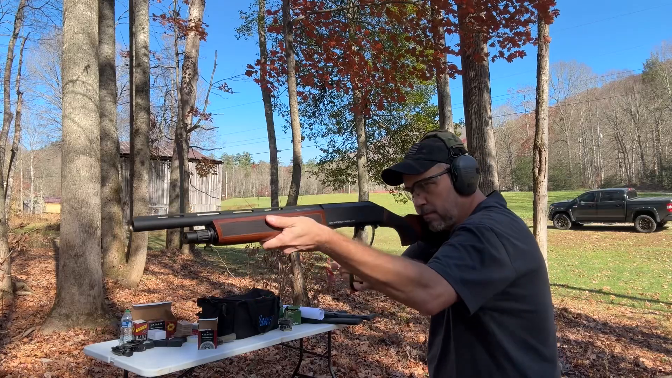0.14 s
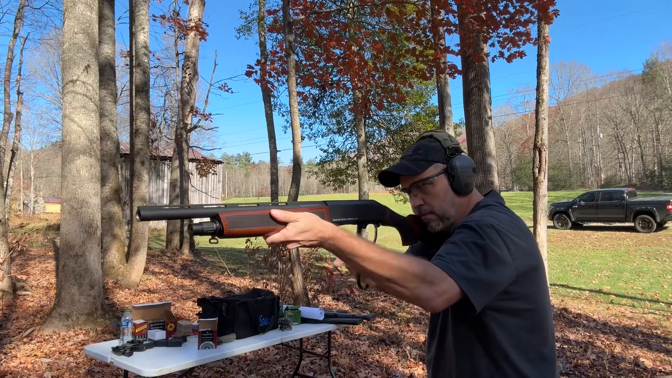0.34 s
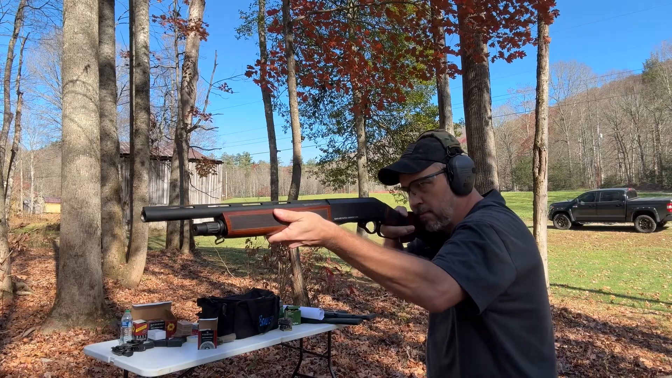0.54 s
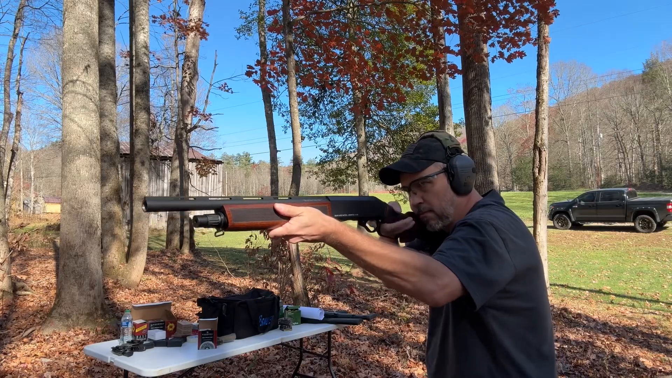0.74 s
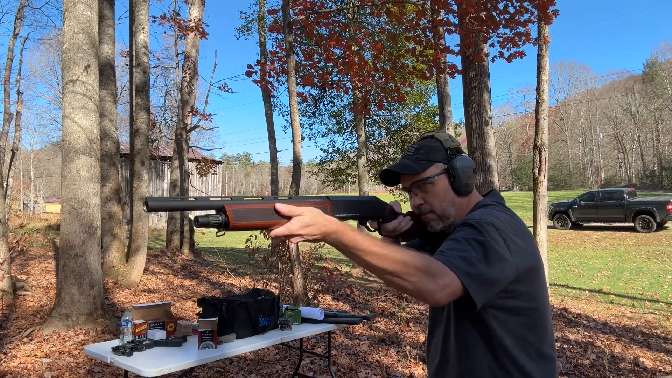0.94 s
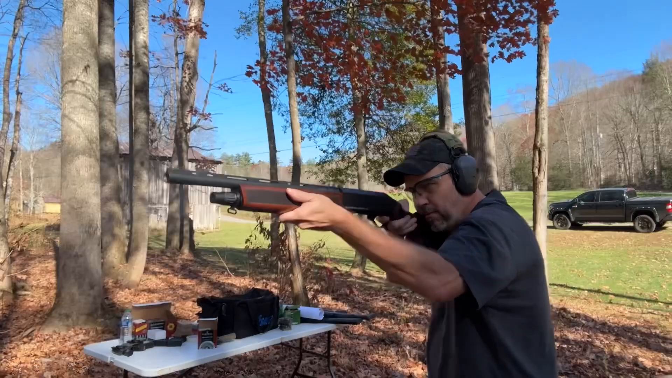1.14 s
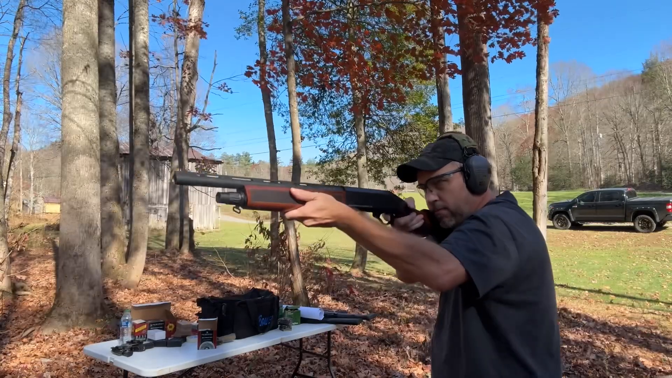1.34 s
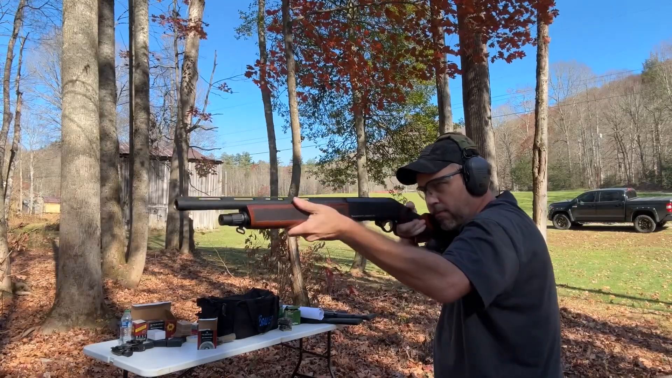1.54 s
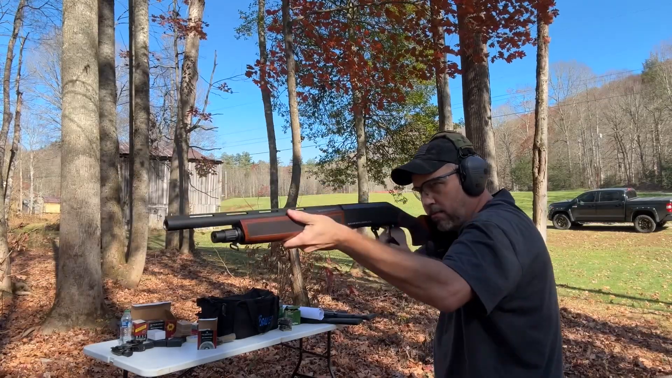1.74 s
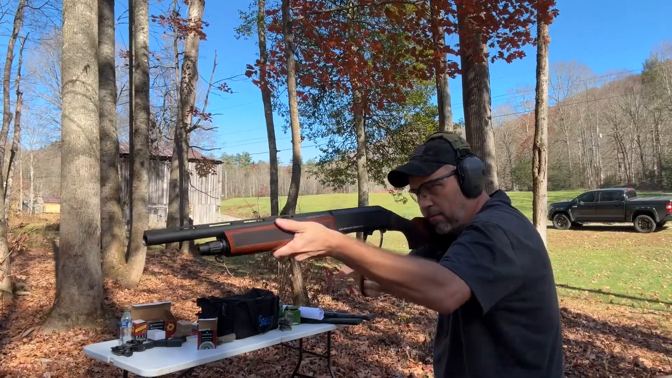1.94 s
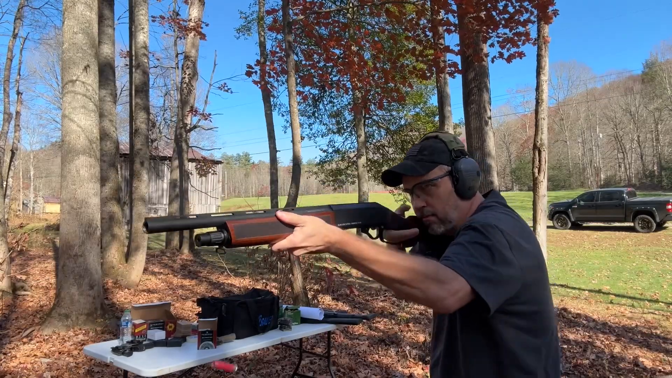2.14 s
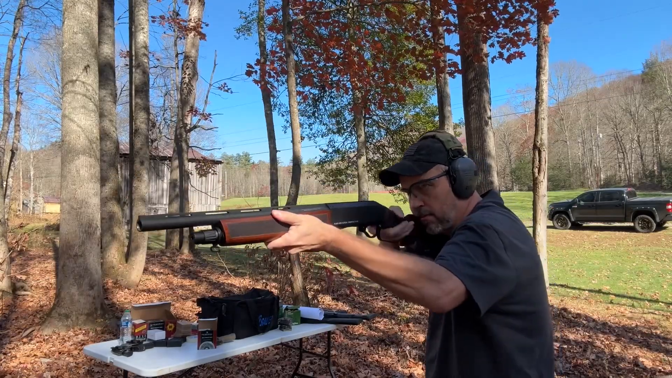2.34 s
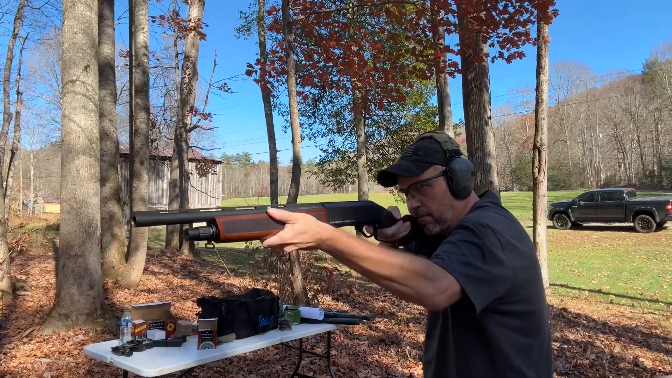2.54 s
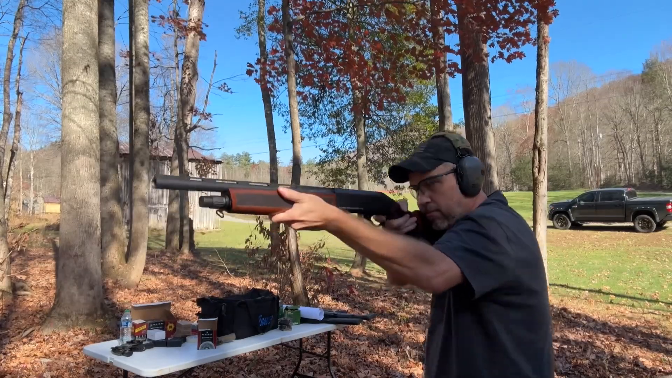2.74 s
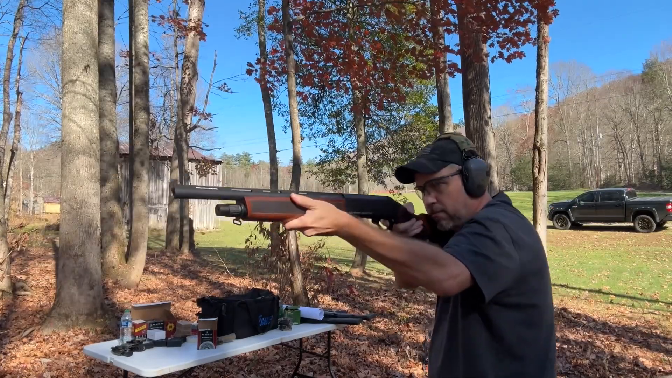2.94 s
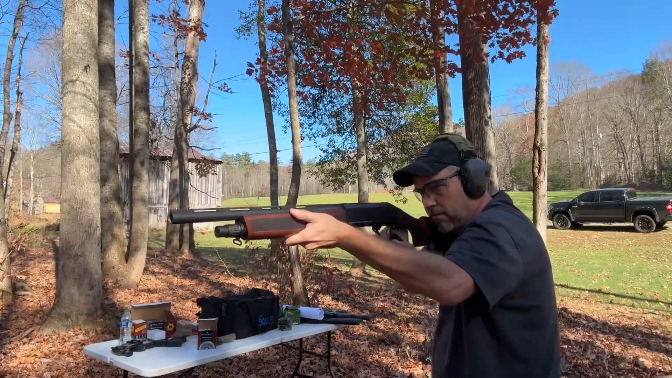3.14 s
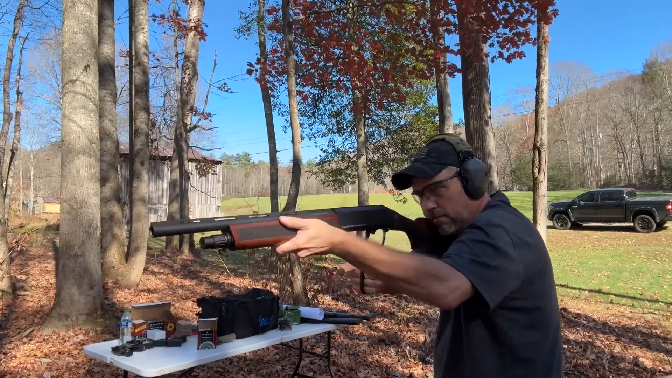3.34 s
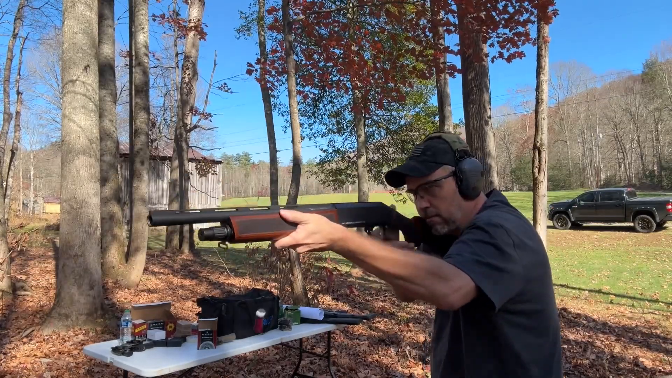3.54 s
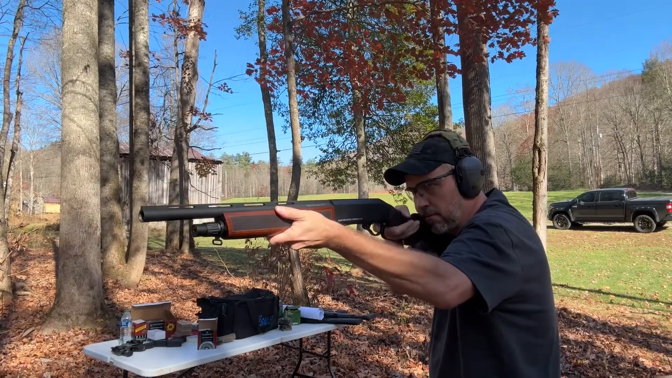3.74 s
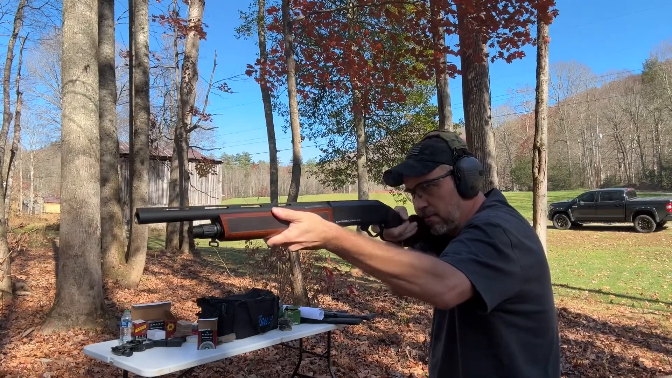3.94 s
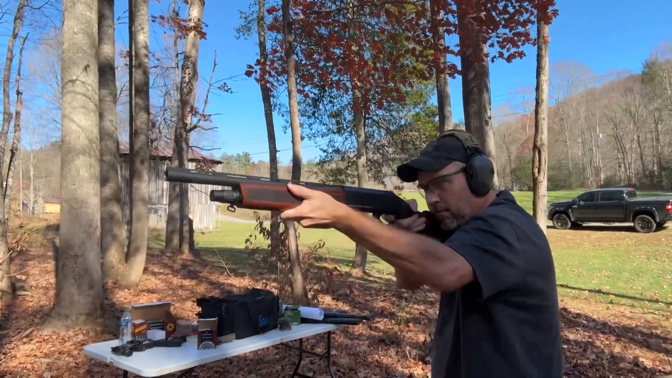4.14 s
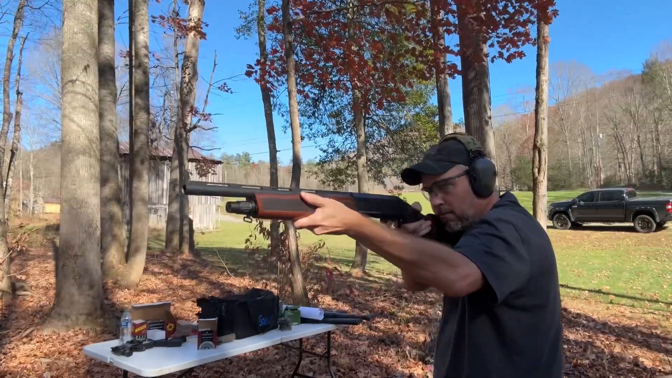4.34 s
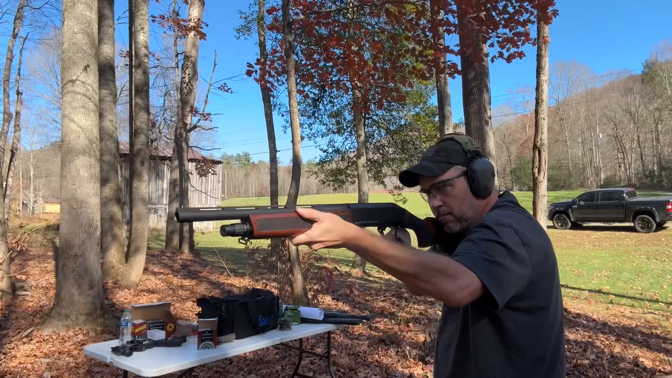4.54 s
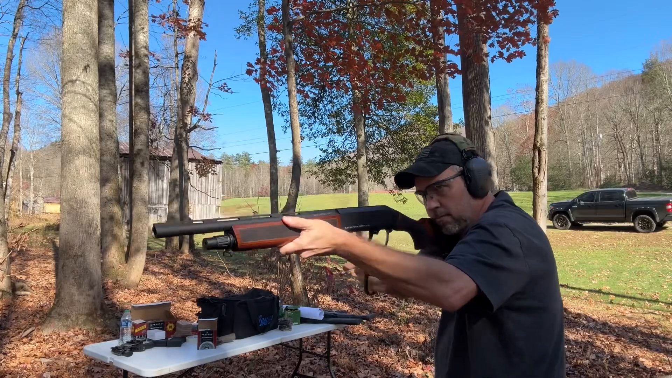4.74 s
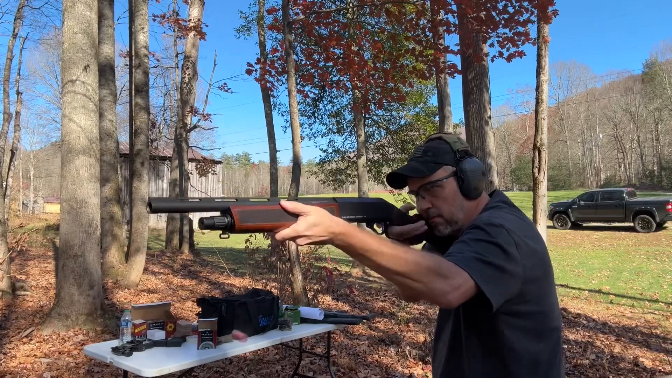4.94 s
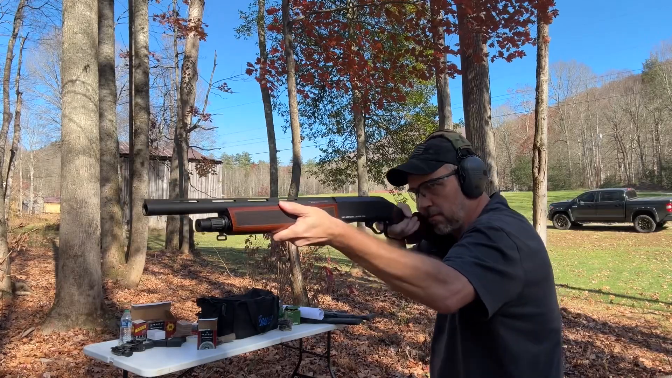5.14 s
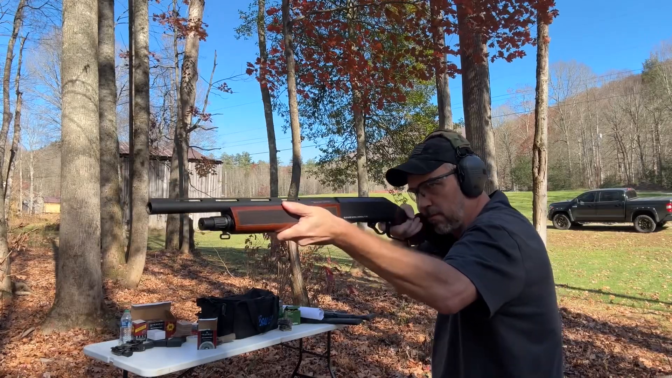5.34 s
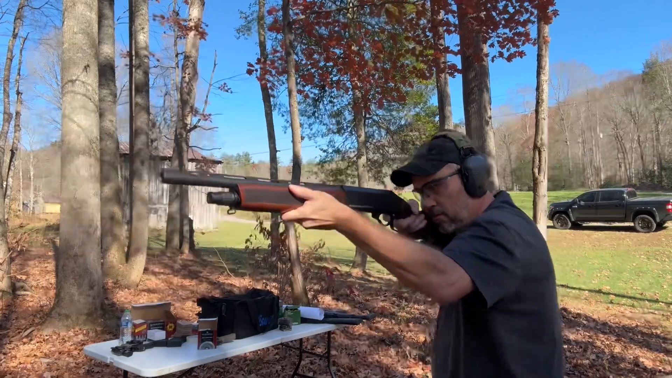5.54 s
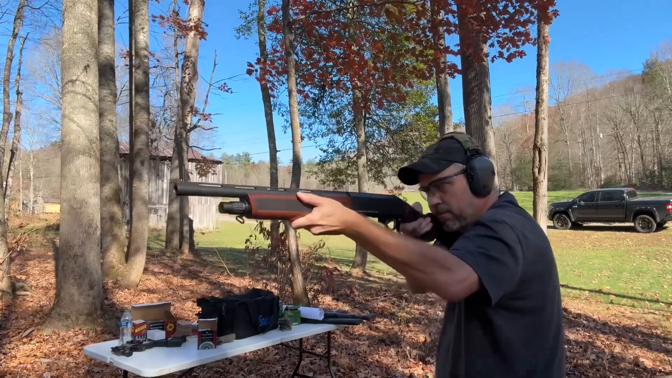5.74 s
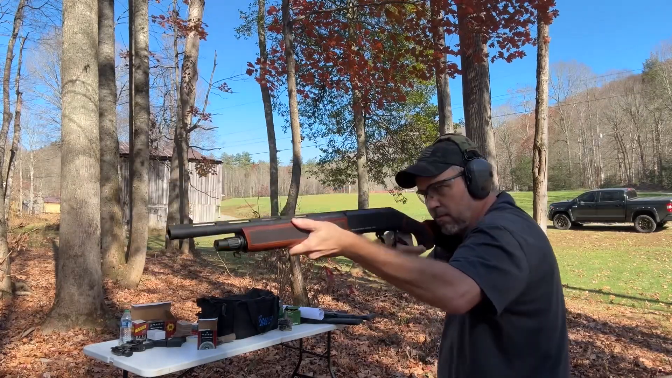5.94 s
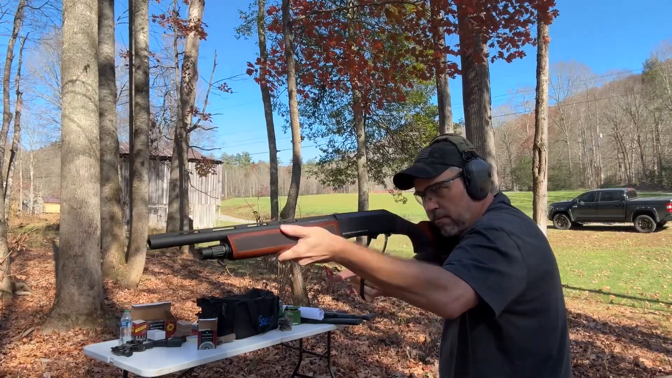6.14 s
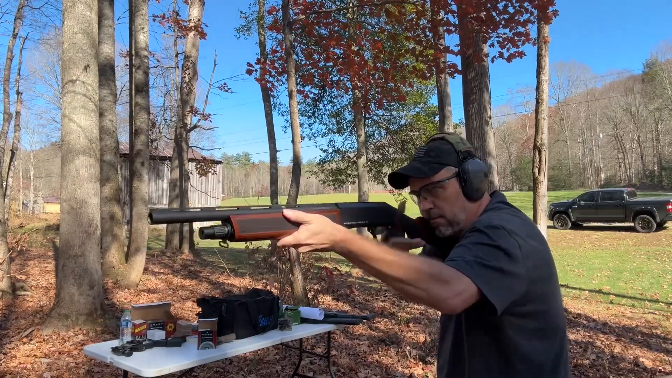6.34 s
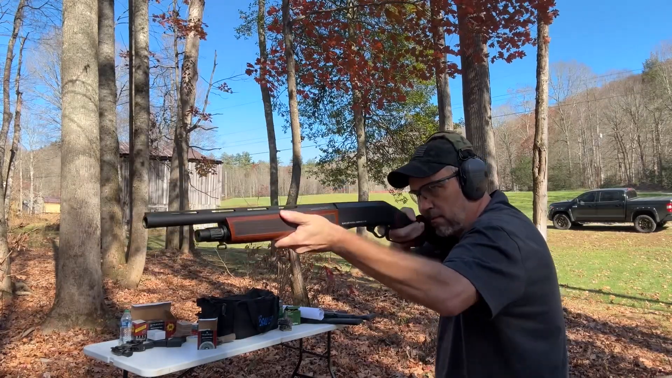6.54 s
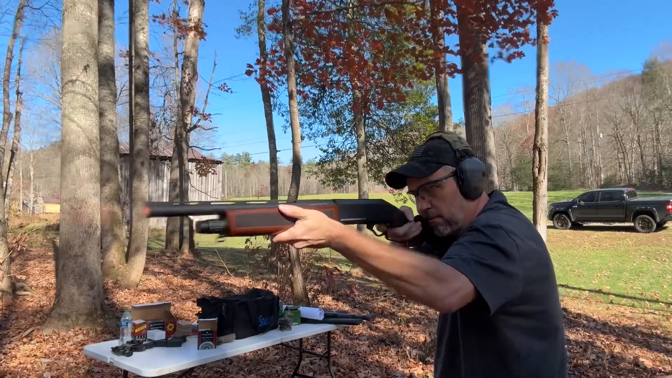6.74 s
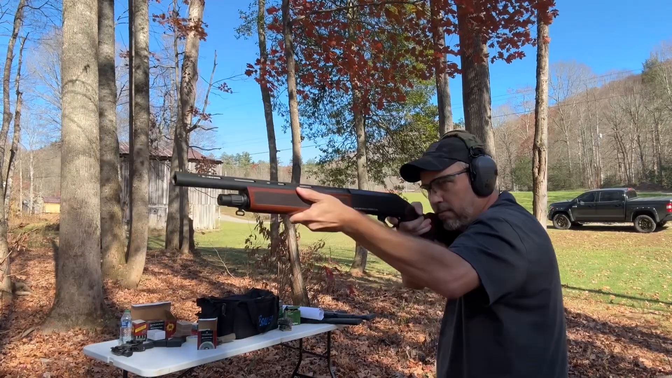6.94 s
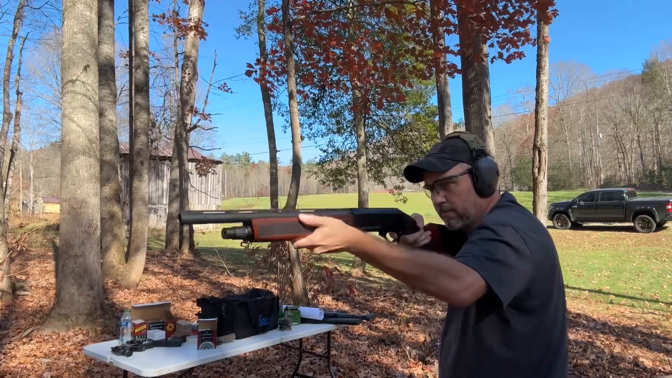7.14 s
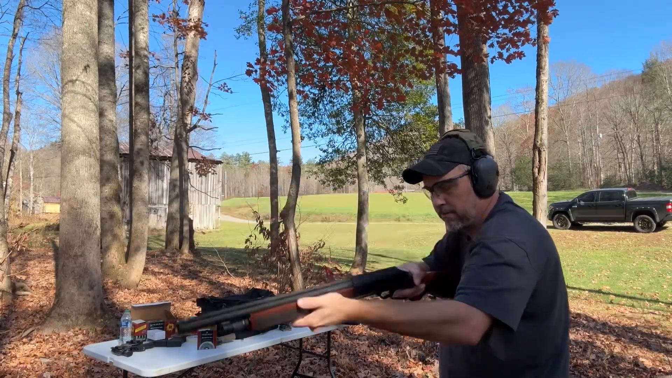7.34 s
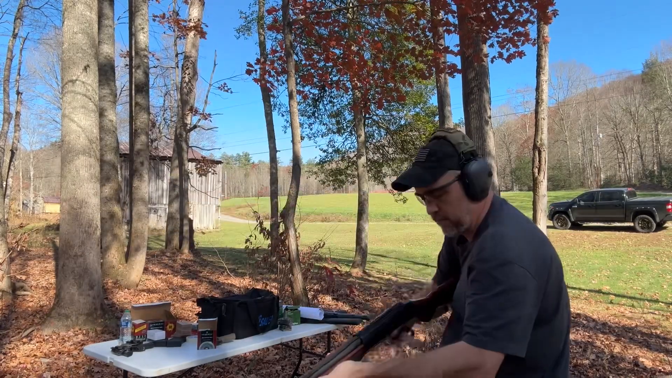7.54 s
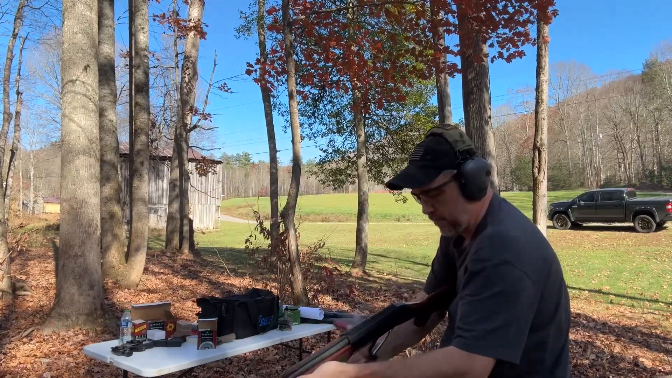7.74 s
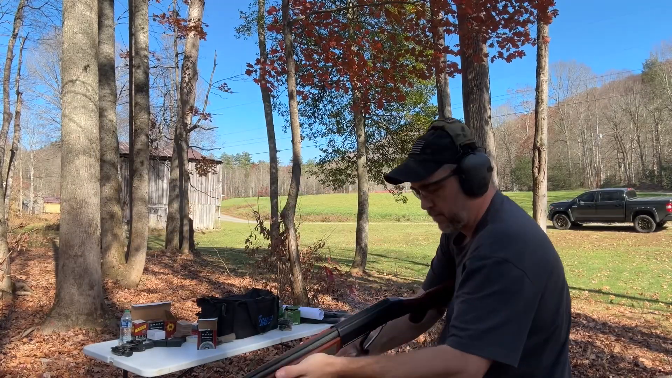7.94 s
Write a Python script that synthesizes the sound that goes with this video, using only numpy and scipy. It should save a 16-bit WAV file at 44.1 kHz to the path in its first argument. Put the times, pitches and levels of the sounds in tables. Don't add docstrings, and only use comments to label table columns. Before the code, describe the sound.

Outdoors at a wood's edge, a lever gun is worked sharply and fired five times, each blast booming and echoing off trees and hillside.

```python
import sys
import numpy as np
from scipy import signal
from scipy.fft import rfft, irfft, next_fast_len
from scipy.io import wavfile
from scipy.ndimage import uniform_filter1d, map_coordinates

SR = 44100
rng = np.random.default_rng(int(sys.argv[2]) if len(sys.argv) > 2 else 0)


def waveform_to_disk(signal):
    frames = np.transpose(np.atleast_2d(signal))
    scaled = np.clip(frames, -1, 1) * 32767
    samples = np.round(scaled).astype(np.int16)
    wavfile.write(sys.argv[1], SR, samples)


def boost(x):
    u = np.asarray(x, float) / 20
    return 10 ** u


N = 356442

# [t/s, crack/dB, lead-in/s, lead-in/dB, pause before crack/s]
SHOTS = [
    (1.13, -9, 0.017, -5, 0.0036),
    (2.633, -3.5, 0.027, -11.5, 0.0006),
    (3.999, -4, 0.027, -19.5, 0.00046),
    (5.4948, -8.5, 0.029, -23.5, 0.00044),
    (6.777, -7, 0.022, -25, 0.00075),
]
# [near trees/dB, far hillside/dB, trunks/dB, barn/dB, tree line/dB]
ANSWERS = [
    (-14, -33.5, 0, -11.5, -7),
    (-15, -30, 2, 5.5, -6.5),
    (-14, -30, 0, -5, 9),
    (-16, -28, -4, 2.5, 7),
    (-14, -29.5, 0, -1.5, 5),
]
# [t/s, early/dB, late/dB]
ECHO_GAIN = [
    (1.1305, 1, -5),
    (2.6339, -1.5, -1.5),
    (3.999, 0, -1.5),
    (5.4942, -3, 1),
    (6.7776, 0.5, 0.5),
]
# [f/Hz, likeness/1]
WOODS_ALIKE = [(40, 1), (130, 0.66), (400, 0.21), (800, 0.53), (1500, 0.21), (3000, 0.037)]
# [f/Hz, density/dB per Hz]
STEEL = [(70, -48), (130, -30.5), (200, -20), (570, -3.5), (1800, -5), (2500, -6), (4300, -6), (9600, -8),
         (13200, -13.5), (16500, -18)]
# [f/Hz, level/dB, t60/s]
BOLT = [(1268, -8, 0.056), (1590, -7, 0.022), (1828, -4.5, 0.037), (2211, -10.5, 0.052),
        (2730, -10.5, 0.032), (3824, -6, 0.017), (4286, -7, 0.017), (5240, -10, 0.012), (7795, -17.5, .035),
        (8230, -11, .03), (10230, -3, 0.056), (10470, -7.5, 0.043), (11700, -8.5, 0.034),
        (13600, -5.5, 0.03)]


def unit(x):
    return x / np.sqrt(np.mean(x ** 2) + 1e-20)


def along(points, hz):
    f, v = np.transpose(points)
    return np.interp(np.log(hz + 1), np.log(f + 1), v)


def filtered(x, response):
    m = next_fast_len(x.shape[-1] + 2048)
    return irfft(rfft(x, m) * response(np.fft.rfftfreq(m, 1 / SR)), m)[..., :x.shape[-1]]


def spread(pair, alike, lead_s=0):
    m = next_fast_len(pair.shape[-1] + 8192)
    hz = np.fft.rfftfreq(m, 1 / SR)
    turn = np.arccos(np.clip(along(alike, hz), -1, 1)) / 2
    mid, side = rfft(pair, m) * [np.cos(turn), np.sin(turn)]
    shift = np.exp(1j * np.pi * hz * lead_s)
    return irfft(np.array([(mid + side) * shift, (mid - side) / shift]), m)[:, :pair.shape[-1]]


def add(track, s, sound):
    part = track[..., max(round(s * SR), 0):][..., :sound.shape[-1]]
    part += sound[..., :part.shape[-1]]


def swells(rows):
    gain = np.zeros(N)
    t = np.arange(-SR // 10, SR // 2) / SR
    for s, db, rise, hold, fall in rows:
        shape = boost(db - rise * np.clip(-t, 0, 1) - fall * np.clip(t - hold, 0, 1))
        add(gain, s + t[0], shape[max(-round((s + t[0]) * SR), 0):])
    return uniform_filter1d(gain, size=60)


def tail(seconds, spectrum, t60, patchy_db):
    noise = rng.standard_normal((2, round(seconds * SR)))
    noise = filtered(noise, lambda hz: boost(along(spectrum, hz)))
    hz, t, z = signal.stft(unit(noise), SR, nperseg=256)
    patches = uniform_filter1d(rng.standard_normal(z.shape[1:]), size=12, axis=0)
    patches = uniform_filter1d(patches, size=6, axis=1)
    t60_s = np.clip(along(t60, hz), .05, 9)[:, None]
    z = z * boost(patchy_db * unit(patches) - 60 * t / t60_s)
    return signal.istft(z, SR, nperseg=256)[1]


def crack(t, db):
    decay = boost(db - 1.0 - 60 * t / 0.024)
    return decay * (1 - np.exp(-t / 0.00018)) * rng.standard_normal((2, len(t)))


def lead_in(t, lead_s, lead_db, pause_s):
    left_s = lead_s - pause_s - t
    edges = np.clip(np.minimum(left_s / 0.00044, t / 0.005), 0, 1)
    rise = boost(lead_db - 30 * left_s / lead_s) * edges

    def bands(hz):
        comb_db = np.where(hz < 700, 6, 10 * np.cos(2 * np.pi * hz / 1100))
        return boost(-hz / 1300 + comb_db) * (hz > 80) * (hz < 7800)

    return rise * unit(filtered(rng.standard_normal((2, len(t))), bands))


def slap(kicks, t, s, answer_db):
    # [delay/s, left lead/ms, pulse length/ms, level/dB]
    surfaces = dict(trunks=[(.004, -0.018, 0.91, -5), (0.036, -0.47, 0.53, -6), (0.058, 0.71, .4, -10.5),
                (.132, -0.41, 0.41, -19)], barn=[(.017, -0.44, 0.99, -7.5), (.078, 0.47, 0.14, -12.5)],
                tree_line=[(0.251, .4, 0.5, -22.5), (.3, .5, 4.3, -26)])
    for rows, more_db in zip(surfaces.values(), answer_db):
        for delay, lead_ms, pulse_ms, db in rows:
            u = 1000 * t / pulse_ms
            debris = .25 * np.exp(-t / .004 - delay / .15) * rng.standard_normal((2, len(t)))
            ragged = (1 - u) * np.exp(-u) + debris
            ragged *= boost(db + more_db + 12) * rng.choice([-1, 1])
            add(kicks[0], s + delay - lead_ms / 2000, ragged[0])
            add(kicks[1], s + delay + lead_ms / 2000, ragged[1])


def blasts():
    # [f/Hz, width/Hz, level/dB]
    ground_modes = [(115.7, 36, -8.5), (265, 60, -1), (460, 59, -13.5), (967, 220, -3), (2360, 13000, -16)]
    out, kicks = np.zeros((2, N)), np.zeros((2, N))
    t = np.arange(SR // 10) / SR
    for (s, crack_db, lead_s, lead_db, pause_s), (_, _, *answer_db) in zip(SHOTS, ANSWERS):
        add(out, s, crack(t, crack_db))
        add(out, s - lead_s, lead_in(t, lead_s, lead_db, pause_s))
        slap(kicks, t, s, answer_db)

    def ground(f):
        return sum((-1) ** k * boost(db) * 1j * f * w / (c * c - f * f + 1j * f * w)
                   for k, (c, w, db) in enumerate(ground_modes))

    return out + filtered(kicks, ground)


def boom():
    # [t/s, level/dB, hold/s, fall/(dB/s)]
    ground_swells = [(1.13, -23.5, .012, 249), (1.25, -55, .01, 330), (1.365, -44, 0.057, 400),
                     (1.499, -64, 0.05, 251), (2.677, -23.5, 0.021, 1200), (2.743, -18.5, 0.011, 380),
                     (2.856, -36.5, 0.1, 600), (3.045, -55.5, .01, 67), (4.032, -15.5, 0.0037, 450),
                     (4.114, -26.5, 0.029, 300), (4.226, -33.5, 0.098, 459), (4.41, -56, .01, 89),
                     (5.515, -19, 0.0032, 551), (5.574, -20, 0.0069, 212), (5.704, -30.5, 0.04, 198),
                     (5.846, -51, .06, 279), (6.83, -33, .012, 201), (6.904, -29, .006, 699),
                     (6.967, -26.5, 0.053, 306), (7.12, -48, 0.064, 300), (7.36, -63, .05, 58)]
    t = np.arange(N) / SR
    wander = [map_coordinates(knots, [np.arange(N) / N * 190]) for knots in rng.standard_normal((2, 200))]
    level = swells([(s, db, 2000, hold, fall) for s, db, hold, fall in ground_swells])
    for s, *_ in SHOTS:
        level[round((s - .1) * SR):round(s * SR)] = 0
    hurry = sum(.6 * np.exp(-np.clip(t - s, 0, 9) / .04) * (t > s - .01) for s, *_ in SHOTS)
    phase = 2 * np.pi * np.cumsum(48.5 * (1 + hurry + .1 * wander[0])) / SR
    offset = (.2 * wander[1] + .6) * np.array([[1], [-1]])
    return np.sqrt(2) * level * np.sin(phase + offset)


def echoes():
    # [delay/s, level/dB, f/Hz, left lead/ms]
    trunks = [(0.0032, -17, 434.6, 0.12), (0.0195, -18.5, 444.5, 0.41), (0.0408, -10.5, 468, 0.62),
              (0.0599, -13, 544.4, 0.45), (0.0799, -18.5, 583, 0.68), (0.0965, -23, 487, 0.48),
              (0.1189, -25.5, 580, 0.71), (0.1355, -18, 541, 0.56), (0.1465, -22, 495, 0.68),
              (0.1684, -26, 476, 0.82), (0.1869, -27, 476, 1.12), (0.2149, -24.5, 520, 0.85),
              (0.2527, -21.5, 558, -0.76), (0.2703, -30.5, 472, -0.8), (0.2833, -30.5, 500, 0.16),
              (0.301, -35.5, 476, -0.33), (0.3161, -41.5, 477, -0.02), (0.3318, -38.5, 425, 1),
              (0.3551, -32.5, 457, 0.65), (0.3775, -32.5, 514, 0.6), (0.3963, -35, 490, 1.3),
              (0.419, -31.5, 414, 0.36), (0.4299, -33, 480, 0.4), (0.4407, -32.5, 450, 0.46),
              (0.4718, -36.5, 507, 0.64), (0.4941, -37.5, 427, 0.04), (0.5057, -39.5, 475, -0.54),
              (0.5177, -37, 492, 0.27), (0.5313, -35, 424, 0.33), (0.5495, -45.5, 510, 0.41),
              (0.5675, -43, 480, -0.99), (0.5852, -46, 500, 0.06), (0.6089, -42, 386, 0.55),
              (0.649, -40, 540, -0.65), (0.676, -41, 455, -0.64), (0.6963, -42, 487, -0.88),
              (0.7236, -43.5, 490, 1.02), (0.7465, -43, 390, 0.062), (0.7691, -46.5, 508, -0.6),
              (0.7802, -46.5, 454, -0.45), (0.8219, -42.5, 490, 0.64), (0.8447, -46, 490, 0.53),
              (0.876, -47, 470, -0.71), (0.8924, -49.5, 487, -1), (0.9105, -47, 437, -0.53),
              (0.93, -48, 543, 0.97)]
    half_s, late_s = 0.0029, 0.19
    out, answer = np.zeros((2, N)), np.zeros((2, SR))
    t = np.arange(-SR // 50, SR // 50) / SR
    puff = lambda hz: (hz > 800) / (1 + (hz / 2500) ** 2)
    for (delay, db, hz, lead_ms), start in zip(trunks, rng.uniform(0, 2 * np.pi, len(trunks))):
        u = t + lead_ms / 2000 * np.array([[1], [-1]])
        scatter = boost(-19.5) * unit(filtered(rng.standard_normal(u.shape), puff))
        cycles = np.sin(2 * np.pi * hz * u + start) + scatter
        add(answer, delay, boost(db) * np.exp(-(u / half_s) ** 2 / 2) * cycles)
    late = np.clip((np.arange(SR) / SR + t[0]) / late_s, 0, 1)
    for s, early_db, late_db in ECHO_GAIN:
        add(out, s + t[0], boost(early_db + (late_db - early_db) * late) * answer)
    return out


def woods():
    # [f/Hz, t60/s]
    near, near_t60 = [(60, -10), (110, -12.5), (200, -18), (330, -17), (500, -12), (950, -17),
                      (2500, -18.5), (6000, -25.5), (11000, -25.5), (14000, -32.5), (16500, -35)], [(100, 0.41), (450, 0.94), (1500, 0.37), (4000, 0.38), (8000, 0.37),
                                    (14000, 0.27)]
    far_tone, far_t60 = [(40, -41), (70, -15), (180, -20), (310, -4), (510, -5.5), (700, -12),
                         (1300, -15.5), (3000, -18.5), (5500, -24.5), (9000, -29.5), (13000, -54),
                         (15000, -99)], [(100, 2), (450, 3.11), (1500, 2.35), (4000, 1.44), (9000, 0.81)]
    # [t after shot/s, level/dB]
    hillside = [(0, -14), (0.119, -10.5), (.25, -2), (.36, -3.5), (.43, -0.5), (.58, -3), (.9, -2), (1, 0),
                (1.12, -0.5), (1.24, 2.5), (3, 10)]
    out = np.zeros((2, N))
    far = tail(3, far_tone, far_t60, patchy_db=1.3)
    deep = filtered(far, lambda hz: 1 / (1 + (hz / 750) ** 6))
    t = np.arange(far.shape[1]) / SR
    swell_db = np.interp(t, *np.transpose(hillside))
    upper_db = -4.5 * np.exp(-t / 0.15)
    far = spread(boost(swell_db) * deep + boost(upper_db) * (far - deep), WOODS_ALIKE, lead_s=0.00046)
    usual = tail(1.1, near, near_t60, patchy_db=1.5)
    turn = lambda hz: np.arctan((hz / 1500) ** 2)
    usual = filtered(usual, lambda hz: np.cos(turn(hz)))
    for (s, *_), (near_db, far_db, *_) in zip(ECHO_GAIN, ANSWERS):
        fresh = filtered(tail(1.1, near, near_t60, patchy_db=1.5), lambda hz: np.sin(turn(hz)))
        add(out, s, boost(near_db) * spread(usual + fresh, WOODS_ALIKE, lead_s=-.0006))
        add(out, s, boost(far_db) * far)
    return out


def ridge():
    # [t/s, level/dB, rise/(dB/s), hold/s, fall/(dB/s)]
    returns = [
        (2.36, -55.5, 58, 0.11, 100),
        (2.54, -52.5, 108, 0.075, 199.5),
    ]
    # [f/Hz, density/dB per Hz]
    tone = [(150, -36.5), (260, -7), (380, 3.5), (520, 2), (700, -15), (1100, -41)]
    hz = np.fft.rfftfreq(next_fast_len(N), 1 / SR)
    lows = boost(along(tone, hz)) * (hz > 120) * (hz < 1300)
    lows = lows * np.exp(2j * np.pi * rng.random((2, len(hz))))
    lumps = map_coordinates(rng.standard_normal(200), [np.linspace(0, 190, N)])
    return swells(returns) * boost(3 * lumps) * unit(irfft(lows)[:, :N])


def action():
    # [unlock t/s, peak/dB, bolt free after/ms, peak/dB]
    unlocks = [
        (1.7239, -45, 24.5, -39.5),
        (3.1384, -42.5, 8.4, -37.5),
        (4.5241, -38.5, 26, -36.5),
        (5.9424, -38.5, 11.5, -48),
    ]
    # [hammer cocks t/s, peak/dB, end stop after/ms, peak/dB, bounce/dB]
    stops = [
        (1.8056, -36, 32.4, -28.5, -34),
        (3.2465, -32, 33.4, -26.5, -30.5),
        (4.6254, -31.5, 30, -27.5, -29),
        (6.0804, -30.5, 21.5, -28.5, -39.5),
    ]
    # [snap t/s, peak/dB, three feed contacts before it/dB]
    closes = [
        (0.4832, -10.5, -21, -16.5, -27),
        (2.151, -30, -39, -36, -50),
        (3.5986, -29.5, -38, -38.5, -43),
        (4.9445, -28, -40, -60, -48),
        (6.3862, -25, -40.5, -41.5, -42),
    ]
    # [low knock/dB, t60/s, favoured f/Hz]
    kinds = dict(unlock=(-10, 0.11, 4100), free=(-1.1, .07, 2300), hammer=(-13, 0.084, 13000),
             stop=(-4, 0.13, 1500), bounce=(0.54, 0.049, 4600), start=(-2, .06, 3400),
             feed=[(0, 0.12, 2500), (-2, .07, 3100), (4, .085, 3600)], latch=(3.7, .05, 1300),
             snap=(0, 0.096, 1700), seat=(0, 0.05, 5100))
    # [level re contact/dB, rise/(dB/s), hold/s, fall/(dB/s)]
    drag_kinds = dict(free=(-23.5, 700, 0.16, 700), hammer=(-16, 6000, -0.0538, 900),
                  stop=(-9.5, 2500, 0.0149, 694), feed=(-27, 2499, 0.0737, 1500),
                  snap=(-8, 9000, 0.009, 1300))
    # [t/s, peak/dB, low knock/dB, t60/s, favoured f/Hz]
    loading, touches = [(.003, -20.5, -3.5, .06, 12890), (.008, -10.5, -11, .06, 12790),
                        (.0124, -7, 0, 0.085, 1880), (.0195, -11.5, 2.5, .06, 3194),
                        (.0384, -11, 5.5, 0.081, 2080), (.0574, -17, 6, .05, 1295),
                        (.066, -19.5, -6, .04, 11800), (.076, -25, -1.5, .04, 11630),
                        (.0822, -10.5, -2.5, .04, 4105), (.0935, -23, -3.5, .05, 4480),
                        (.2259, -47.5, -6, .1, 12040), (.3426, -45, 10.5, 0.14, 1329),
                        (.383, -52, 10, .07, 2300), (.4125, -26.5, -2.5, .05, 4347),
                        (.42, -19, -3.5, .05, 12050), (.4364, -16, 5.5, .1, 1486),
                        (.456, -23, 4.5, .05, 1493), (.461, -24, 2.5, 0.045, 1404),
                        (.478, -13.5, -2.5, .05, 4290), (.4845, -6.5, -2.5, .04, 4290),
                        (.4893, -10.5, -4, .05, 4410), (.4965, -23.5, 1.5, .04, 2000),
                        (.503, -24, -0.5, .05, 4200), (.5124, -30, 11, .043, 1285),
                        (.5224, -31.5, 7, .04, 1306), (.531, -36, 9, .04, 1290),
                        (.7856, -53, -8.5, .073, 11980), (.8126, -47.5, -6, .06, 4260),
                        (.8535, -50, -5, .1, 12030), (.877, -54, -8, .05, 12100),
                        (.918, -55.5, -9.5, 0.058, 12500), (.949, -58, -9, .04, 12500),
                        (1.039, -57.5, -10, .04, 12000)], [(2.4555, -39, -3, .056, 2100), (2.3865, -57, -12, .04, 11500),
                                         (3.92, -39, -2.5, 0.12, 4300), (5.2869, -45.5, -7, 0.075, 4300),
                                         (5.424, -58.5, -7.5, .04, 4110), (6.742, -42, -5.5, .2, 4300),
                                         (1.735, -47, -3.5, .04, 11900), (1.778, -51.5, 6, .04, 3700),
                                         (1.8255, -43, -13, .05, 3700), (1.832, -41, 5, .04, 2000),
                                         (6.1175, -23, -9, 0.081, 11730), (6.1065, -22, -12, 0.045, 12600),
                                         (4.662, -32, -14, 0.043, 3700), (4.44, -57, -12, .04, 12100),
                                         (3.201, -57, 17, .04, 2000), (3.2874, -30, 0.5, .04, 3700),
                                         (3.3378, -41, -19.5, 0.062, 12000), (7.545, -42, 1, .05, 11500),
                                         (7.5542, -32.5, -4.5, 0.057, 11300),
                                         (7.5612, -30, -5, 0.091, 11930), (7.583, -49, 6, .03, 2986),
                                         (7.606, -32, -15, 0.03, 11500), (7.6261, -42, -3, 0.089, 4340),
                                         (7.6378, -38, -5, .04, 11930), (7.655, -41, -8, .04, 11960),
                                         (7.6695, -40.5, 6, 0.031, 3050), (7.7273, -48, -11, .035, 4310),
                                         (7.7548, -49, -14, .05, 4200), (7.7937, -41.5, -8, 0.05, 3980),
                                         (7.8444, -59, -3, .035, 4300)]
    # [t/s, level/dB, hold/s, fall/(dB/s)]
    scrapes = [(.002, -21.5, 0.012, 260), (0.419, -29, 0.017, 399.5), (0.087, -37.5, 0.0033, 1198),
               (0.101, -55.5, 0.0023, 259), (0.402, -35, 0.0096, 152), (0.494, -49.5, 0.04, 205.5),
               (2.451, -48, .008, 900), (7.566, -52.5, 0.0029, 550), (7.614, -55.5, 0.0034, 149.5)]
    feed_before_s, start_before_s = (.079, .056, .033), .098
    hits = list(loading) + list(touches)
    drags = [(s, db, 1800, hold, fall) for s, db, hold, fall in scrapes]

    def drag(s, db, kind):
        drags.append((s, db + drag_kinds[kind][0], *drag_kinds[kind][1:]))

    for s, db, free_ms, free_db in unlocks:
        free_s = s + free_ms / 1000
        hits += [(s, db, *kinds["unlock"]), (free_s, free_db, *kinds["free"])]
        drag(free_s, max(db, free_db), "free")
    for s, db, stop_ms, stop_db, bounce_db in stops:
        stop_s = s + stop_ms / 1000
        hits += [(s, db, *kinds["hammer"]), (stop_s, stop_db, *kinds["stop"])]
        hits += [(stop_s + 0.024, bounce_db, *kinds["bounce"])]
        drag(s, db, "hammer")
        drag(stop_s, stop_db, "stop")
    for s, db, *feed_db in closes:
        hits += [(s - start_before_s, -48, *kinds["start"]), (s, db, *kinds["snap"])]
        hits += [(s - 0.0071, db - 19.5, *kinds["latch"]), (s + .0075, db - 6, *kinds["seat"])]
        hits += [(s - before, level, *kind)
                 for before, level, kind in zip(feed_before_s, feed_db, kinds["feed"])]
        drag(s - feed_before_s[0], db, "feed")
        drag(s, db, "snap")
    return hits, drags


def steel_colour(hz):
    return boost(along(STEEL, hz)) * (hz > 110)


def contact(t, seating_s, db, knock_db, t60, own_hz):
    favour_db = lambda hz: 6 * np.exp(-(np.log((hz + 1) / own_hz) / .18) ** 2)
    short = SR // 20
    after = np.clip(t - seating_s, 0, 1)
    rise = boost(-28 * np.clip(1 - t / seating_s, 0, 1))
    noise = rng.standard_normal((2, 2, len(t)))
    spacing_oct, offset = rng.uniform([.5, 0], [1, 2 * np.pi])

    def split(hz):
        clumps_db = 4.5 * np.cos(2 * np.pi * np.log2(hz + 1) / spacing_oct + offset)
        tone = steel_colour(hz) * boost(favour_db(hz) + clumps_db)
        return tone * np.array([[hz > 3200], [hz < 3200]])

    bright, low = map(unit, filtered(noise, split))
    fade = boost(-60 * after / 0.0095) + 0.43 * boost(-60 * after / max(t60, .01))
    ring = np.zeros((2, len(t)))
    for hz, level_db, mode_t60 in BOLT:
        decay_db = level_db + favour_db(hz) + rng.normal(0, 2.9) - 60 * after[:short] / min(mode_t60, .05)
        phase = 2 * np.pi * hz * rng.normal(1, 0.024) * t[:short] + rng.uniform(0, 7.1, (2, 1))
        ring[:, :short] += boost(decay_db) * np.sin(phase)
    return boost(db - 7.5) * rise * (fade * (bright + boost(knock_db) * low) + boost(-5.5) * ring)


def scrape():
    grit = boost(3 * uniform_filter1d(rng.standard_normal(N), size=70) * np.sqrt(70))
    modes = lambda f: .5 + sum(boost(db + 3) * np.exp(-((f - c) / (.05 * c)) ** 2) for c, db, _ in BOLT)
    grains = unit(grit * rng.standard_normal((2, N)))
    return unit(filtered(grains, lambda hz: steel_colour(hz) * modes(hz)))


def lever():
    # [f/Hz, likeness/1]
    steel_alike = [(200, 1), (2500, 0.34), (3600, 0.27), (6000, 0.057)]
    # [f/Hz, t60/s]
    yard_t60 = [(300, 0.12), (3000, 0.75), (12000, 0.5)]
    steel = np.zeros((2, N))
    t = np.arange(SR // 7) / SR
    hits, drags = action()
    seating_s = .0015
    for s, *hit in hits:
        add(steel, s - seating_s + .0012, contact(t, seating_s, *hit))
    steel = spread(steel + boost(0.5) * swells(drags) * scrape(), steel_alike)
    steel = signal.sosfilt(signal.butter(4, 150, "high", fs=SR, output="sos"), steel)
    yard = tail(0.93, [(100, 0)], yard_t60, patchy_db=-1.0)
    yard = yard / np.linalg.norm(yard[0])
    return steel + boost(-22.5) * signal.fftconvolve(steel, yard, axes=1)[:, :N]


def barrel():
    tube_hz = (1384, 2826, 3817)
    # [start/s, length/s, change/(dB/s), level/dB]
    rings = [
        [(.68, .445, 6.5, -58.5), (.5, 0.205, -12, -55)],
        [(.5, .17, -89.5, -56)],
        [(.535, 0.19, -22, -51), (.7, 0.7, -14, -68), (2.16, .47, -27.5, -62), (3.61, 0.35, -18, -69.5),
         (4.96, 0.53, -15, -79), (5.17, .17, 10, -83.5), (6.4, .345, -47, -58)],
    ]
    out = np.zeros((2, N))
    for hz, rows in zip(tube_hz, rings):
        for start, length, change_db, db in rows:
            t = np.arange(round(length * SR)) / SR
            edge = np.clip(np.minimum(t, t[::-1]) / .025, 0, 1)
            phase = 2 * np.pi * hz * (t + round(start * SR) / SR) + np.array([[0], [.3]])
            add(out, start, edge * boost(db + change_db * t) * np.sin(phase))
    return out


def stock():
    # [t/s, f/Hz, level/dB, t60/s]
    thuds = [
        (.001, 59, -50, 0.3),
        (0.482, 195, -28.5, 0.092),
        (1.84, 73, -63, .2),
        (2.152, 131, -55.5, 0.092),
        (2.454, 220, -42, 0.038),
        (3.6, 130, -53, 0.077),
        (4.945, 151, -51.5, 0.086),
        (4.99, 54.7, -67, .5),
        (6.387, 141, -52, 0.1),
    ]
    out = np.zeros((2, N))
    t = np.arange(SR // 2) / SR
    for s, hz, db, t60 in thuds:
        swing = np.sin(2 * np.pi * hz * t + np.array([[0], [.5]]))
        add(out, s, boost(db - 60 * t / t60) * (1 - np.exp(-t / 0.0057)) * swing)
    return out


def air():
    # [f/Hz, density/dB per Hz]
    tone = [(30, -12.5), (100, -9), (400, -6), (1200, -4), (2500, -8.5), (5000, -21.5), (9000, -25),
            (13500, -24.5), (14300, -45.5)]
    settle_db = (0, 1.5, -5, -10.5, -8, -9)
    duck_db, duck_s, air_db = -24.5, 0.44, -63.5
    since = np.arange(N) / SR - np.array([[s] for s, *_ in SHOTS])
    gain_db = ((since > 0) * (duck_db * np.exp(-(since / duck_s) ** 2))).sum(axis=0)
    gain_db = gain_db + np.array(settle_db)[(since > 0).sum(axis=0)]
    ticks = boost(2.5 * uniform_filter1d(rng.standard_normal(N), size=150) * np.sqrt(150))
    hush = unit(filtered(ticks * rng.standard_normal((2, N)), lambda hz: boost(along(tone, hz))))
    return boost(air_db + gain_db) * spread(hush, WOODS_ALIKE)


def scene():
    return blasts() + woods() + boom() + lever() + stock() + barrel() + air() + ridge() + echoes()


def band_limit(x):
    return signal.sosfilt(signal.butter(12, 17850, fs=SR, output="sos"), x)


def record(dry):
    # [f/Hz, gain/dB]
    port_gain = [(100, 0), (14000, -0.5), (15500, -10), (16700, -17.5), (17300, -70.5)]
    # [from/s, to/s]
    thinned = [
        (.03, .062),
        (.39, .456),
        (1.138, 1.36),
        (2.642, 2.86),
        (4, 4.24),
        (5.501, 5.73),
        (6.79, 7.01),
    ]
    m = next_fast_len(N + 8192)
    hz = np.fft.rfftfreq(m, 1 / SR)
    share = np.clip((hz - 7400) / 1600, 0, 1) ** 2
    turn = np.exp(1j * np.pi * (12100 - np.minimum(hz, 14400)) / 4900 * np.array([[-1], [1]]))
    ports = rfft(dry, m) * boost(along(port_gain, hz))
    x = irfft(ports * np.sqrt(1 - share) + ports[0] * np.sqrt(share) * turn, m)[:, :N]
    top = irfft(ports[0] * (hz > 14700), m)[:N]
    sudden = uniform_filter1d(np.abs(top), size=150) / (uniform_filter1d(np.abs(top), size=3000) + 1e-9)
    x = x + .8 * top * np.clip(sudden - 1.2, 0, 1)
    x = x / (1 + np.abs(x / .95) ** 4) ** (1 / 4)

    def treble_bands(f):
        return np.clip((750 - np.abs(f - 9620)) / 400, 0, 1) + np.clip((f - 13800) / 500, 0, 1)

    spare = filtered(x.mean(axis=0), treble_bands)
    corners_s = np.repeat(thinned, 2) + np.tile([-.002, 0, 0, .01], len(thinned))
    steady = np.interp(np.arange(N) / SR, corners_s, np.tile([0, 1, 1, 0], len(thinned)))
    x = signal.sosfilt(signal.butter(2, 32, "high", fs=SR, output="sos"), x - steady * spare)
    x = signal.sosfilt(signal.cheby2(10, 60, 17700, fs=SR, output="sos"), x)
    return band_limit(x)


dry = scene()
out = record(dry)
waveform_to_disk(out)
```